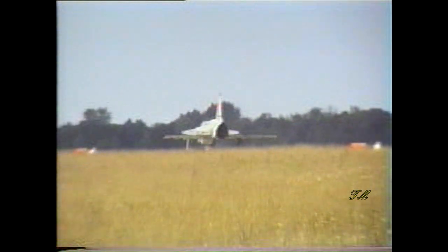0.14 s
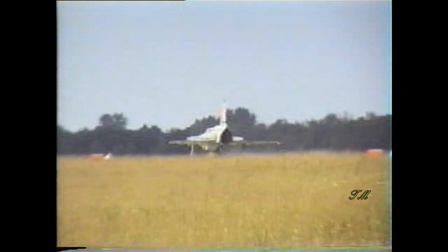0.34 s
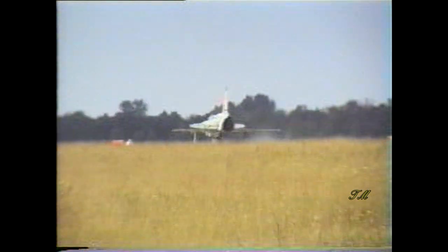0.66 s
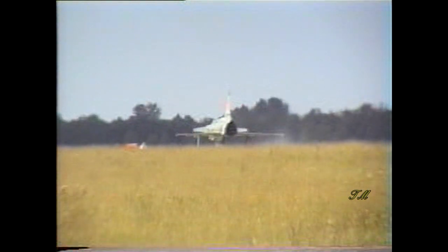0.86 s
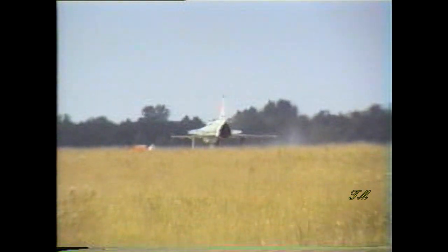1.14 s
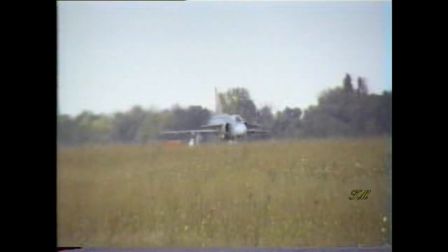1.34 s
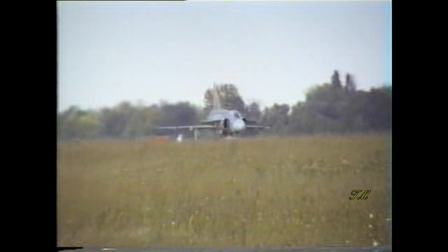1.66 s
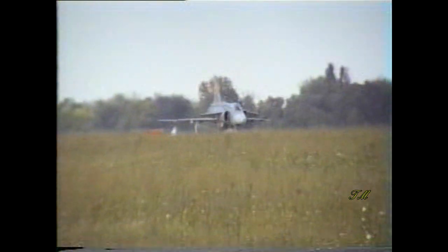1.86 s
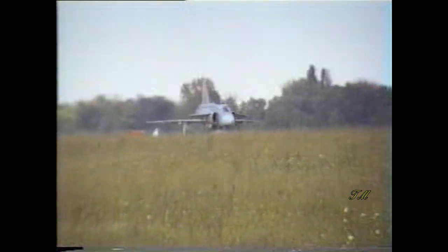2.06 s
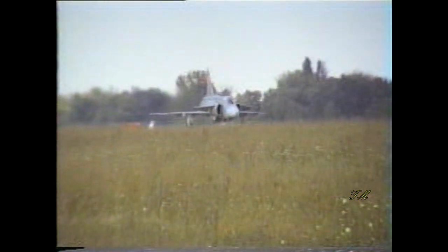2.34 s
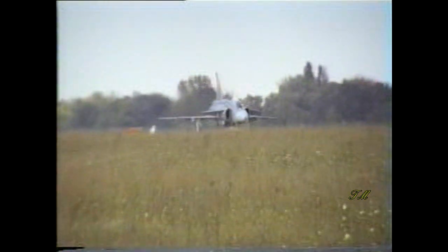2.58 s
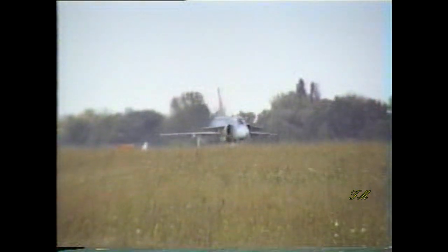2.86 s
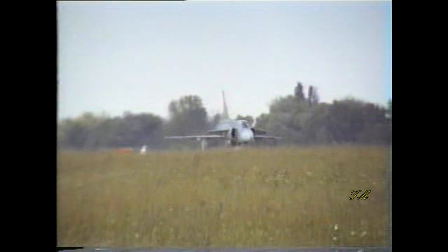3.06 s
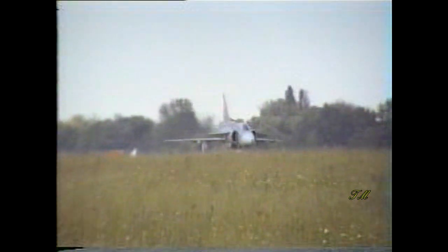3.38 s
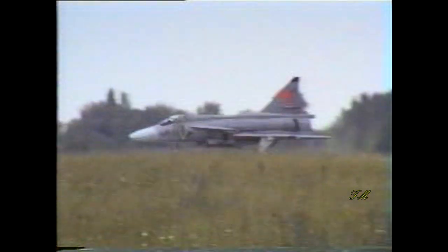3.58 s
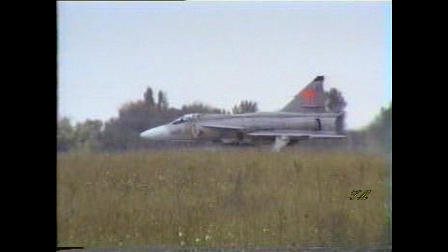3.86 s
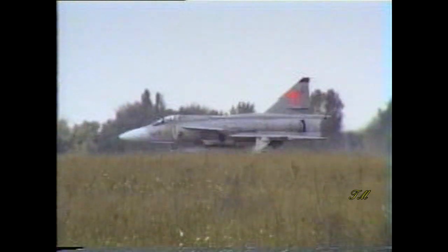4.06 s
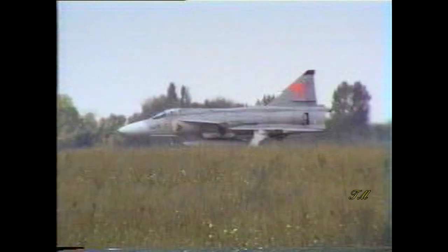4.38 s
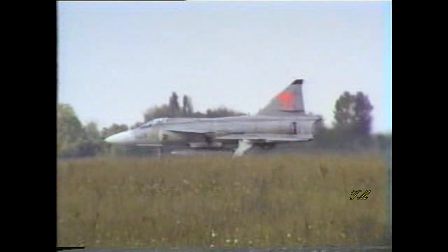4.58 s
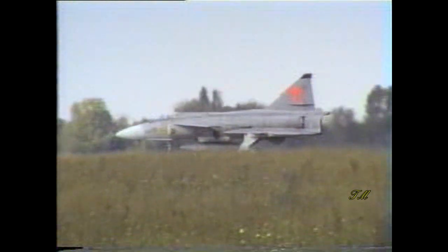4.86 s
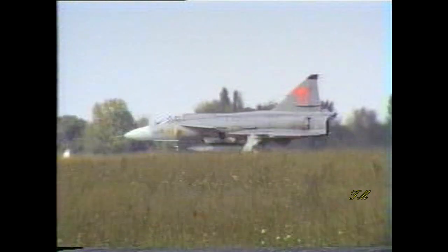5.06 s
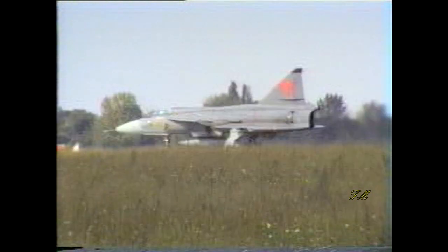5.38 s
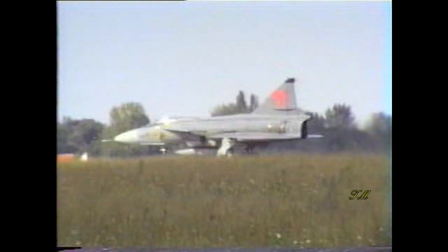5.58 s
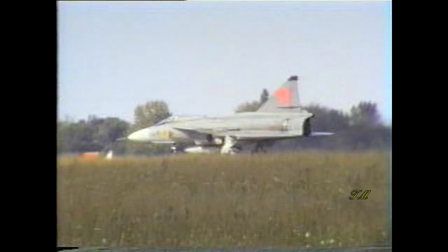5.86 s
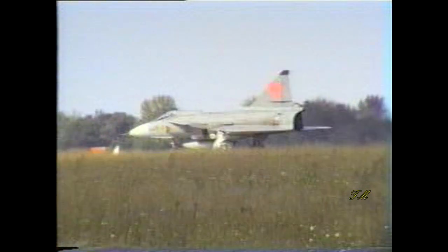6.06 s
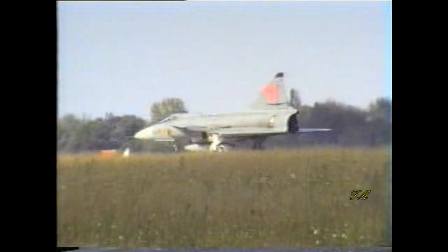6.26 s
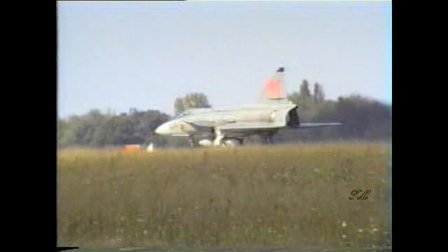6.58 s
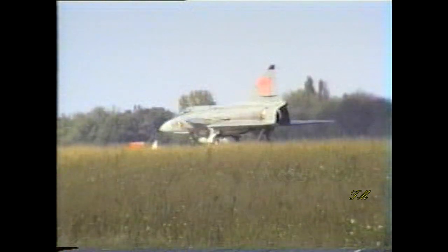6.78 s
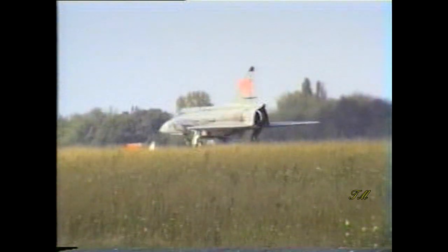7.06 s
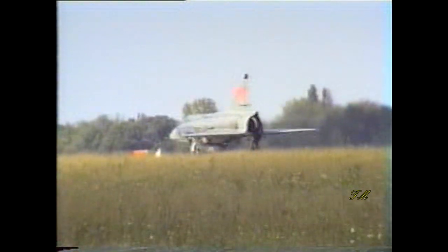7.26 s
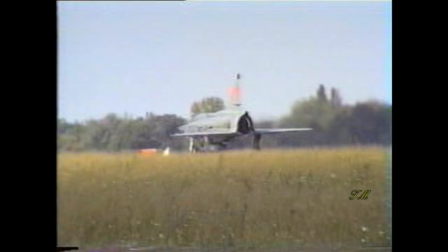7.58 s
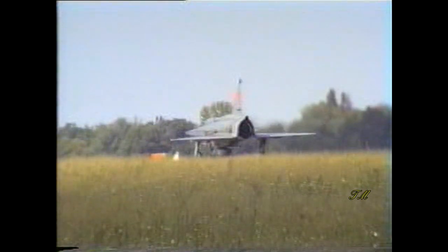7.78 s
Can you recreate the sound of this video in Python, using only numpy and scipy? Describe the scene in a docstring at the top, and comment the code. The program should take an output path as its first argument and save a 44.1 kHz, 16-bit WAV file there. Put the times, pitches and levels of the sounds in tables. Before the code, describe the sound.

Wind thumps on the microphone while a jet's dull roar jumps to a piercing, wavering whine and a fuller passing roar.

```python
"""Wind thumps on the microphone over the dull roar of a jet fighter, far off across an airfield's grass.
The taxiing jet is heard from behind, then suddenly from the front, then suddenly from the side as it
rolls past. Its spinning fan and compressor blades whine above the roar of rushing gas, and churning air
makes their tones waver and flare up. The wind drops as the jet comes by; a faint hiss lies under it all."""
import sys
import numpy as np
from scipy import signal
from scipy.fft import rfft, irfft
from scipy.io import wavfile
from scipy.ndimage import uniform_filter1d

SR = 44100
rng = np.random.default_rng(int(sys.argv[2]) if len(sys.argv) > 2 else 0)


def generate_wav(signal):
    """Clip the signal to [-1, 1] and save it as 16-bit WAV at the path in sys.argv[1]."""
    frames = np.transpose(np.atleast_2d(signal))
    scaled = np.clip(frames, -1, 1) * 32767
    pcm = np.round(scaled).astype(np.int16)
    wavfile.write(sys.argv[1], SR, pcm)


N = 349272
T = np.arange(N) / SR  # time of each sample in seconds
HZ = np.maximum(np.arange(N // 2 + 1) * SR / N, 1)  # frequency of each point in a spectrum
CUTS_S = (1.222, 3.461)  # the sound jumps from tail to nose, then from nose to side

# Levels in the tables are relative: the functions turn each layer up or down when they mix it.
# How deep or bright each noise is. Each row: frequency in Hz, level in dB.
HISS_COLOUR = [(200, -14), (3000, 4), (6000, 4.5), (9000, 5), (11500, 4.5), (13000, 0.5), (14700, -11),
               (15600, -6)]
WIND_COLOUR = [(15, -26), (30, -8), (55, -1.5), (85, 1.5), (125, 1.5), (170, -6.5), (230, -16),
               (310, -29.5), (450, -40.5), (800, -60)]
TAIL_COLOUR = [(250, -15), (450, -4.5), (650, 0.5), (900, 2.5), (1250, -1.5), (1700, -5.5), (2300, -6),
               (3000, -17), (3800, -16), (4600, -22), (6000, -34)]
NOSE_COLOUR = [(300, -11), (480, -12), (600, 0.5), (740, 8), (1000, 5.5), (1200, 2.5), (1500, 2.5),
               (1950, -11.5), (2350, -7.5), (2900, -17.5), (3600, -22.5), (4100, -27), (5000, -33),
               (6200, -68)]
SIDE_COLOUR = [(250, -30), (450, -15), (620, -1), (800, 2.5), (1000, 4.5), (1220, -4), (1450, -2),
               (1800, -8.5), (2000, -14.5), (2800, -15), (3500, -23), (4100, -24), (5000, -29.5),
               (6200, -46)]
REAR_COLOUR = [(250, -27.5), (380, -23.5), (500, -14.5), (620, -5.5), (890, 1.5), (1100, -8), (1250, -8),
               (1500, -7.5), (1900, -21.5), (2250, -11), (2650, -21.5), (3500, -26), (4900, -32),
               (6000, -43.5), (9500, -52)]
RUMBLE_COLOUR = [(20, 5), (42, -0.5), (70, -3.5), (115, 2), (160, 1.5), (205, -10.5), (265, -12), (360, -8),
                 (450, -11)]
# Thin whistles of the electronics. Each row: pitch in Hz, level in dB.
WHISTLES = [(11574, -81), (15127, -84), (15326, -88), (15622, -69), (15676, -85), (15725, -87)]
HISS_DB, TOP_HZ = -62.5, 15850

# The breeze between gusts. Each row: time in seconds, level in dB.
BREEZE = [(0.25, -32), (0.82, -41.5), (1.5, -34), (2.3, -34), (3.6, -29), (3.75, -50)]
# Gusts of wind. Each row: start in seconds, hold in seconds, buffeting in dB, deep heaving in dB.
GUSTS = [(0.0, .12, -21, -28.5), (0.943, 0.35, -30.5, -35.5), (1.275, 0.06, -21, -32),
         (1.415, 0.045, -25.5, -42), (1.675, .12, -24, -39), (1.836, 0.047, -24.5, -19),
         (1.922, 0.099, -29, -25), (2.727, 0.14, -22, -23), (2.9, 0.18, -21, -25.5),
         (3.146, 0.12, -23.5, -27), (3.356, 0.12, -22.5, -24), (3.533, 0.1, -27, -43),
         (3.95, 0.32, -55, -47), (7.377, 0.3, -46, -39.5)]
GUST_RISE_S, GUST_FALL_S = 0.065, 0.057
EDDY_DB, EDDY_GROWTH = -14.5, 0.17  # small swirls next to the buffeting; extra dB for each dB of it

# Where the gas noise's roar, rush and hiss lie. Each row: low edge in Hz, high edge in Hz.
GAS_BANDS = [(500, 1100), (1100, 1530), (2600, 4400)]
# Rushing gas. Each row: time in seconds, then exhaust roar, middle rush and intake hiss in dB.
TAIL_GAS = [(0.3, -44.5, -51.5, -61.5), (0.9, -45.5, -55.5, -61.5)]
NOSE_GAS = [(1.24, -46, -41.5, -50), (1.54, -39.5, -39, -45), (1.86, -37.5, -38, -50),
            (1.89, -42, -42, -51.5), (2.35, -39.5, -41, -50.5), (3.0, -37, -51.5, -42.5),
            (3.1, -37, -44, -46), (3.44, -34.5, -46, -43)]
PASS_GAS = [(3.48, -29.5, -31.5, -31), (3.74, -28.5, -34, -34.5), (4.41, -28.5, -29, -35.5),
            (4.46, -28.5, -31.5, -35.5), (5.13, -30.5, -31, -41), (5.39, -30, -38.5, -42.5),
            (5.73, -31, -37.5, -47), (6.64, -28, -38.5, -47), (6.86, -29, -35.5, -47.5),
            (7.58, -25, -34, -46), (7.9, -32, -41.5, -46.5)]
# Low noise of the exhaust. Each row: time in seconds, rumble in dB, growl in dB.
RUMBLE = [(3.5, -39, -44), (4.4, -40.5, -49), (5.8, -37.5, -52.5), (7.0, -36.5, -47.5), (7.5, -36, -42)]
# Pitch of the blades. Each row: time in seconds, second fan in Hz, core compressor in Hz.
TAIL_PITCH = [(0, 1840, 2045), (1.22, 1820, 2000)]
NOSE_PITCH = [(1.22, 2241, 2466)]
PASS_PITCH = [(3.46, 2148, 2357), (5.2, 2108, 2335), (6.6, 2114, 2327), (7.92, 2100, 2306)]
# Strength of the whine. Each row: time in seconds, then first fan, second fan and core compressor in dB.
TAIL_WHINE = [(0, -59, -57.5, -59), (1.2, -54.5, -64, -60)]
NOSE_WHINE = [(1.3, -51, -31, -45), (1.749, -39, -56, -48), (2.448, -40.5, -38, -58),
              (2.65, -45, -33.5, -68), (3.45, -44.5, -37, -44)]
PASS_WHINE = [(3.46, -31.5, -42, -35), (4.55, -38.5, -46, -47), (5.3, -34.5, -41, -39),
              (6.9, -41.5, -45.5, -48), (7.92, -39, -39, -42)]
# Weaker, higher blade tones. Each row: multiple of the fan shaft's turning rate, multiple of the
# core's pitch to add to it, level in dB next to the intake hiss.
TAIL_OVERTONES = [(48, 0, -30), (64, 0, -23)]
NOSE_OVERTONES = [(48, 0, -10), (56, 0, -19), (24, 1, -11), (64, 0, -15)]
PASS_OVERTONES = [(48, 0, -10), (56, 0, -18), (24, 1, -13), (64, 0, -19)]
# The turbine's whistle. Each row: time in seconds, pitch in Hz, level in dB.
TURBINE = [(5.6, 4800, -62), (6.1, 4650, -56.5), (7.3, 4690, -48.5), (7.6, 4760, -48), (7.92, 4880, -52)]
# Flares: moments when moving air carries one part of the sound to the listener.
# Each row: peak time in seconds, length in seconds, level in dB, name of the part.
FLARES = [(0.323, 0.25, -53, "fan 1"), (1.305, 0.29, -33.5, "fan 2"), (1.502, 0.18, -25.5, "fan 2"),
          (1.53, 0.21, -40, "core"), (1.772, .1, -33.5, "fan 2"), (2.187, 0.19, -34, "fan 2"),
          (2.746, 0.19, -33, "fan 2"), (2.86, 0.19, -55.5, "sum tone"), (2.88, 0.35, -38, "core"),
          (3.43, 0.2, -43, "core"), (3.487, 0.044, -30, "fan 2"), (3.59, .16, -34, "fan 1"),
          (3.62, 0.1, -37, "core"), (3.864, 0.2, -39.5, "hum"), (3.91, 0.23, -30.5, "fan 2"),
          (3.91, 0.15, -39, "fan 1"), (4.168, 0.22, -34.5, "core"), (4.362, .12, -32, "fan 2"),
          (4.655, 0.11, -48.5, "hiss"), (4.77, 0.16, -31.5, "fan 2"), (5.03, 0.1, -45, "hiss"),
          (5.31, .12, -36, "fan 2"), (5.56, .28, -33.5, "fan 2"), (6.57, 0.22, -43, "core"),
          (6.87, 0.06, -53, "turbine"), (7.134, 0.069, -34.5, "core"), (7.33, 0.069, -53, "turbine"),
          (7.387, 0.099, -41, "core"), (7.82, 0.35, -36, "core")]
FIRST_FAN_BLADES, SECOND_FAN_BLADES = 24, 32
FADE_DB, FADE_HZ = 2.0, 3.0  # how far and how fast the main blade tones fade and return
HUM_DB, HUM_OCTAVE_DB = -48.5, -8  # the engine's low hum; its octave next to the roar


def gain(db):
    """Turn decibels into a number to multiply a sound by."""
    return 10 ** (np.asarray(db) / 20)


def curves(rows):
    """Join a table's rows with straight lines in time, giving one curve for each value column."""
    times, *columns = np.transpose(rows)
    return [np.interp(T, times, column) for column in columns]


def coloured_spectrum(colour):
    """The spectrum of a random noise, shaped by a colour table and falling away past its ends."""
    hz, db = np.transpose(colour)
    shape = gain(np.interp(np.log(HZ), np.log(hz), db))
    edges = np.minimum(HZ / hz[0], 1) ** 2 * np.minimum(hz[-1] / HZ, 1) ** 4
    return shape * edges * rfft(rng.standard_normal(N))


def band_strength(spectrum, band):
    """The average (rms) strength of a sound between two frequencies."""
    inside = (HZ > band[0]) & (HZ < band[1])
    return np.sqrt(2 * np.sum(np.abs(spectrum[inside]) ** 2)) / N


def wander(*rates_hz, weights=(1,)):
    """Smooth random motion: one wobble for each rate, sized by its weight, all added up."""
    count = 16384
    hz = np.arange(count // 2 + 1) * SR / N
    wobbles = (irfft(rfft(rng.standard_normal(count)) / (1 + (hz / rate) ** 2)) for rate in rates_hz)
    motion = sum(weight * wobble / wobble.std() for weight, wobble in zip(weights, wobbles))
    return np.interp(T, np.linspace(0, T[-1], count), motion)


def band_noise(colour, bands, levels, flutter_db, flutter_hz):
    """Noise split into overlapping bands, each following its own level and fluttering at random."""
    spectrum, out = coloured_spectrum(colour), 0
    centres = np.log(bands).mean(axis=1)
    for band, db, this_band in zip(bands, levels, np.eye(len(bands))):
        share = np.interp(np.log(HZ), centres, this_band)
        part = irfft(spectrum * share, N) / band_strength(spectrum, band)
        out = out + part * gain(db + flutter_db * wander(flutter_hz))
    return out


def tone(hz, scatter_db, scatter_hz, fuzz_db=-40, fuzz_hz=90):
    """A tone in churning air: some arrives directly, some is scattered, some smears into a noisy fuzz."""
    shares = gain([scatter_db, fuzz_db])
    along, across = (wander(scatter_hz, fuzz_hz, weights=shares) for _ in range(2))
    cycles = np.cumsum(hz) / SR
    phase = np.float32(2 * np.pi * (cycles - np.floor(cycles)))
    wave = (np.sqrt(2) + along) * np.cos(phase) + across * np.sin(phase)
    return wave / np.sqrt(1 + np.sum(shares ** 2))


def flares(part):
    """The gain that moving air adds to one part: smooth swells that never carry across a cut."""
    power, angle = 0, np.searchsorted(CUTS_S, T)
    for peak_s, length_s, db, name in FLARES:
        if name == part:
            swell = .5 ** np.minimum((2 * (T - peak_s) / length_s) ** 2, 20)
            same_angle = angle == np.searchsorted(CUTS_S, peak_s)
            power = power + gain(db) ** 2 * swell * same_angle
    return np.sqrt(power)


def electronics():
    """Electronics add thin, high whistles and a hiss, which is a little louder after the second cut."""
    hiss_db = HISS_DB + 1.3 * (T > CUTS_S[1])
    hiss = band_noise(HISS_COLOUR, [(7000, 10600)], [hiss_db], flutter_db=.08, flutter_hz=8)
    whistles = sum(gain(db) * np.sqrt(2) * np.sin(2 * np.pi * hz * T) for hz, db in WHISTLES)
    return hiss + whistles


def wind():
    """Gusts rise out of a breeze, push and beat on the microphone, then die away."""
    breeze_db, = curves(BREEZE)
    buffet, heave = gain(breeze_db), gain(breeze_db - 1.5)
    for start, hold, buffet_db, heave_db in GUSTS:
        before_s, after_s = np.maximum(start - T, 0), np.maximum(T - start - hold, 0)
        gust = np.exp(-before_s / GUST_RISE_S - after_s / GUST_FALL_S)
        buffet = np.maximum(buffet, gain(buffet_db) * gust)
        heave = np.maximum(heave, gain(heave_db) * gust)
    heave_db, buffet_db = 20 * np.log10([heave, buffet])
    eddy_db = EDDY_DB + (1 + EDDY_GROWTH) * buffet_db  # strong gusts shed small swirls and sound brighter
    bands_hz, levels = [(20, 60), (60, 300), (250, 450)], (heave_db, buffet_db, eddy_db)
    return gain(-0.9) * band_noise(WIND_COLOUR, bands_hz, levels, flutter_db=2.87, flutter_hz=29.8)


def blade_whine(pitch, strength, gas, overtones, waver, blur_db, blur_hz, **scatter):
    """Two fans on one shaft and the compressor in the engine's core sing at the rate their blades pass."""
    drift = 1 + waver * wander(6.8)  # moving air bends all pitches alike
    fan_hz, core_hz = (hz * drift for hz in curves(pitch))
    shaft_hz = fan_hz / SECOND_FAN_BLADES
    pitches = FIRST_FAN_BLADES * shaft_hz, fan_hz, core_hz
    intake_hiss, out = gain(curves(gas)[2]), 0
    for name, hz, db in zip(("fan 1", "fan 2", "core"), pitches, curves(strength)):
        level = gain(db + FADE_DB * wander(FADE_HZ)) + flares(name)
        out = out + level * tone(hz, **scatter)
    for fan, core, db in overtones:  # shorter waves are scattered more, so they blur
        level = intake_hiss * gain(db) + core * flares("sum tone")
        out = out + level * tone(fan * shaft_hz + core * core_hz, blur_db, blur_hz)
    return out


def jet_from_behind():
    """The jet idles far off with its exhaust towards the listener: a dull roar with faint tones."""
    blades = blade_whine(TAIL_PITCH, TAIL_WHINE, TAIL_GAS, TAIL_OVERTONES, waver=.001,
                         blur_db=2, blur_hz=30, scatter_db=0, scatter_hz=15, fuzz_db=-3, fuzz_hz=50)
    roar = band_noise(TAIL_COLOUR, GAS_BANDS, curves(TAIL_GAS), flutter_db=0.5, flutter_hz=8)
    return gain(0.5) * blades + gain(-1.4) * roar


def jet_from_front():
    """The air intakes face the listener: piercing, nearly clean blade tones over the roar."""
    blades = blade_whine(NOSE_PITCH, NOSE_WHINE, NOSE_GAS, NOSE_OVERTONES, waver=0.001565,
                         blur_db=-4, blur_hz=13, scatter_db=-13, scatter_hz=10, fuzz_db=-16, fuzz_hz=120)
    roar = band_noise(NOSE_COLOUR, GAS_BANDS, curves(NOSE_GAS), flutter_db=1, flutter_hz=16)
    return gain(-2.43) * blades + gain(-0.82) * roar


def jet_passing():
    """Close by: a full roar, tones torn by hot air, and the turbine's whistle as the tail comes round."""
    blades = blade_whine(PASS_PITCH, PASS_WHINE, PASS_GAS, PASS_OVERTONES, waver=0.002596, blur_db=6.5,
                         blur_hz=43.3, scatter_db=-5, scatter_hz=22.1, fuzz_db=-5, fuzz_hz=74.4)
    roar_db, rush_db, hiss_db = curves(PASS_GAS)
    gas_db = roar_db, rush_db, 20 * np.log10(gain(hiss_db) + flares("hiss"))
    side, rear = (band_noise(colour, GAS_BANDS, gas_db, flutter_db=1.23, flutter_hz=6.5)
                  for colour in (SIDE_COLOUR, REAR_COLOUR))
    turn = np.pi / 2 * np.interp(T, (5.0, 5.5), (0, 1))  # the roar hollows out as the tail comes round
    roar = gain(-1.3) * np.cos(turn) * side + gain(-0.87) * np.sin(turn) * rear
    hum_hz = 7 * curves(PASS_PITCH)[0] / SECOND_FAN_BLADES  # seven cycles for each turn of the shaft
    hum = (gain(HUM_DB) + flares("hum")) * tone(hum_hz, scatter_db=0, scatter_hz=2.7)
    octave_level = np.sin(turn) * gain(roar_db + HUM_OCTAVE_DB)  # the octave leaves by the exhaust
    octave = octave_level * tone(2 * hum_hz, scatter_db=0, scatter_hz=4.4)
    turbine_hz, turbine_db = curves(TURBINE)
    turbine = (gain(turbine_db) + flares("turbine")) * tone(turbine_hz, scatter_db=23, scatter_hz=160)
    low_bands_hz = [(25, 360), (260, 1600)]
    rumble = band_noise(RUMBLE_COLOUR, low_bands_hz, curves(RUMBLE), flutter_db=0, flutter_hz=5.8)
    tones = gain(0.26) * blades + gain(-4) * hum + octave + gain(-0.5) * turbine
    return tones + roar + gain(-1.43) * rumble


def scene():
    """Play the jet's three angles in turn, with wind and hiss throughout, the same in both channels."""
    cut_1, cut_2 = (uniform_filter1d(1. * (T > s), size=90) for s in CUTS_S)  # fades of 2 milliseconds
    jet = (1 - cut_1) * jet_from_behind() + (cut_1 - cut_2) * jet_from_front() + cut_2 * jet_passing()
    return np.tile(jet + wind() + electronics(), (2, 1))


def record(dry):
    """The treble flickers faintly between left and right, and the very highest sounds are cut off."""
    treble = signal.sosfilt(signal.butter(4, 1950, "high", fs=SR, output="sos"), dry[0])
    flicker = gain(-28.5) * treble * wander(130)
    stereo = dry + np.array([flicker, -flicker])
    return signal.sosfilt(signal.ellip(10, .1, 80, TOP_HZ, fs=SR, output="sos"), stereo)


dry = scene()
out = record(dry)
generate_wav(out)
```